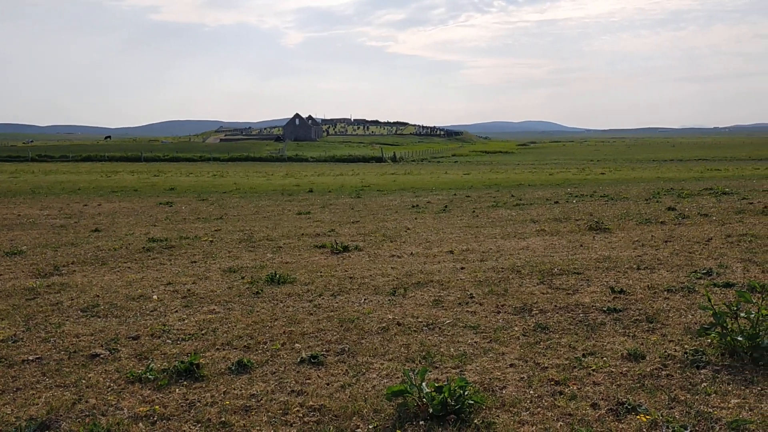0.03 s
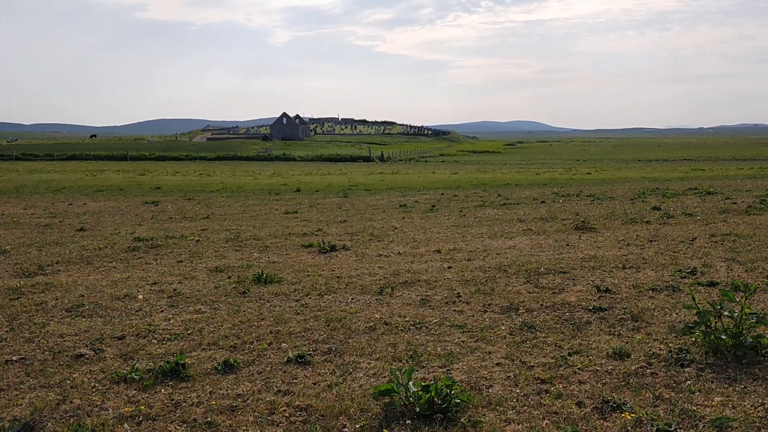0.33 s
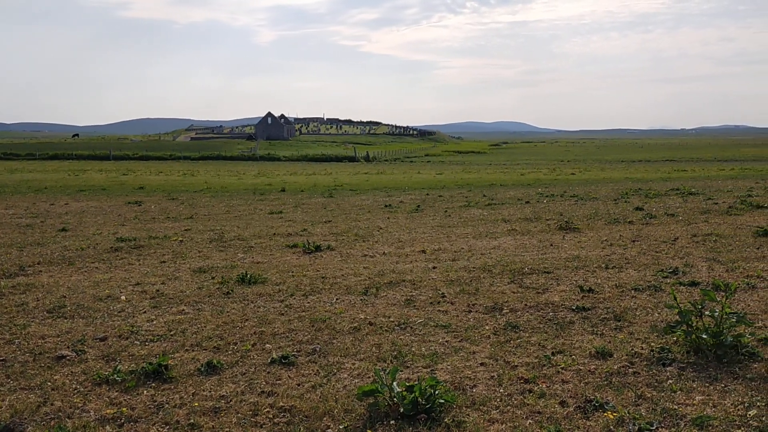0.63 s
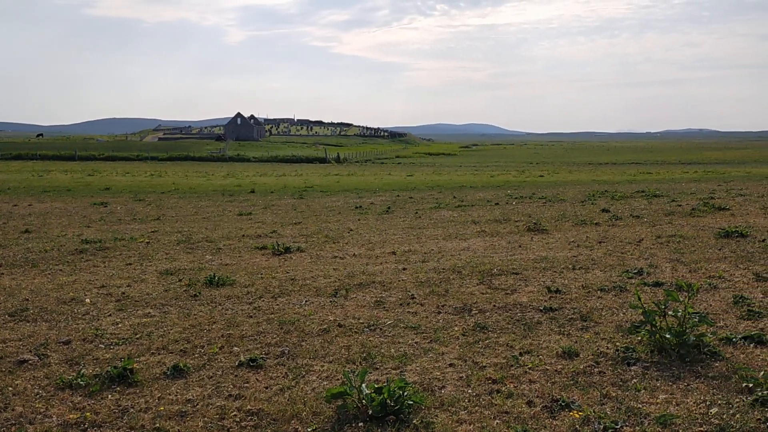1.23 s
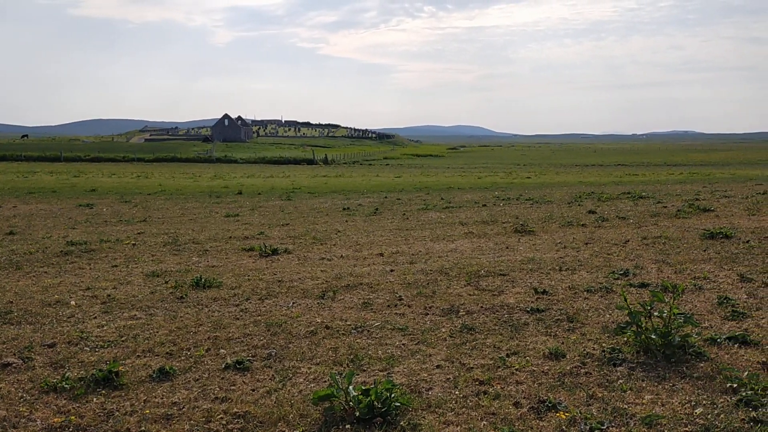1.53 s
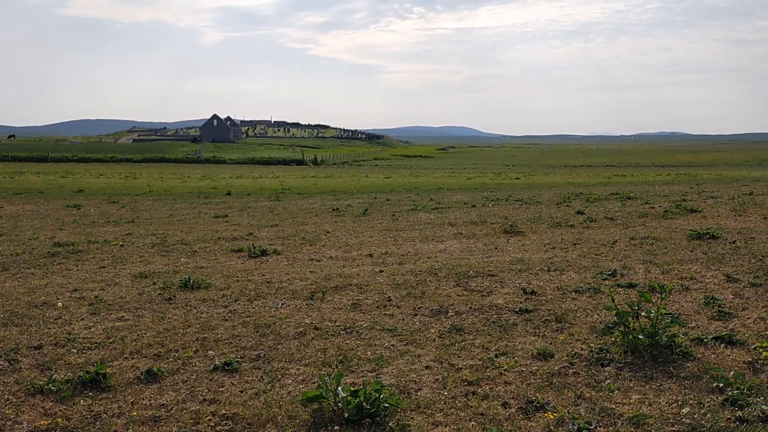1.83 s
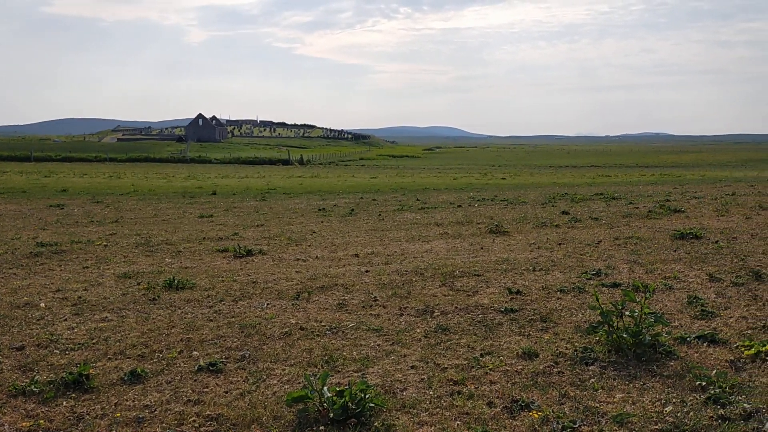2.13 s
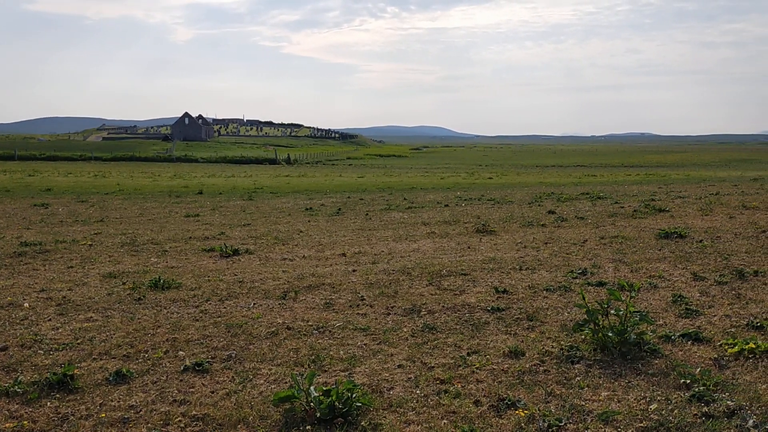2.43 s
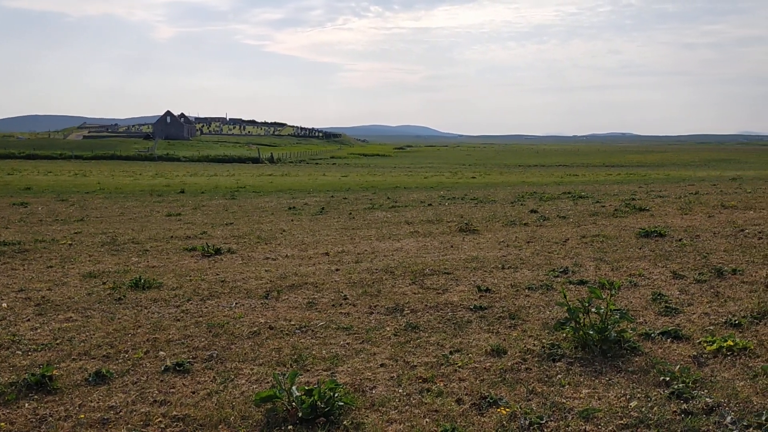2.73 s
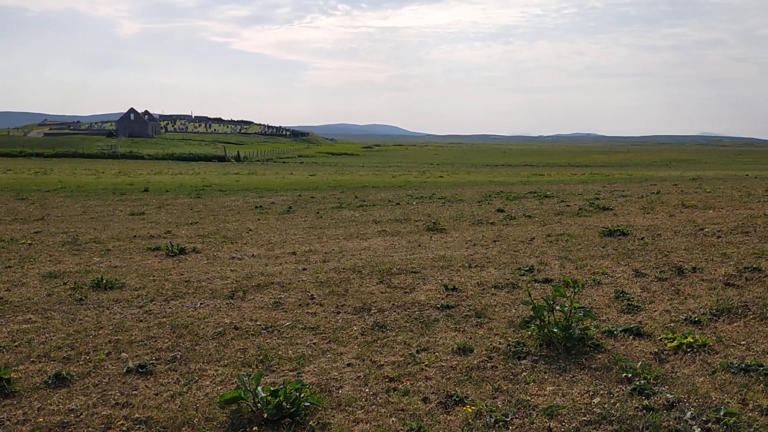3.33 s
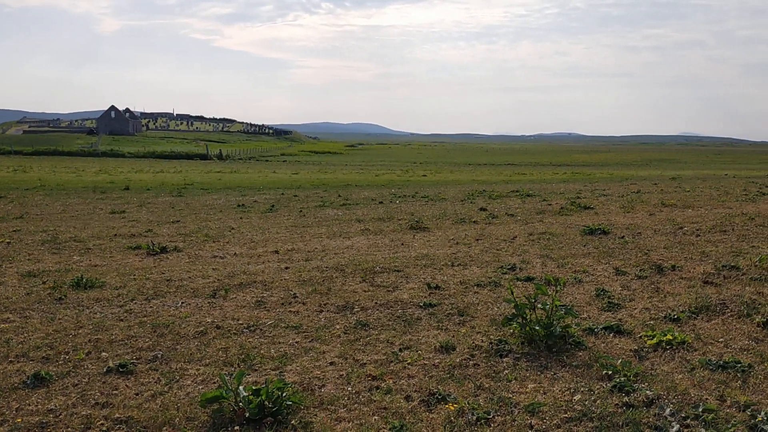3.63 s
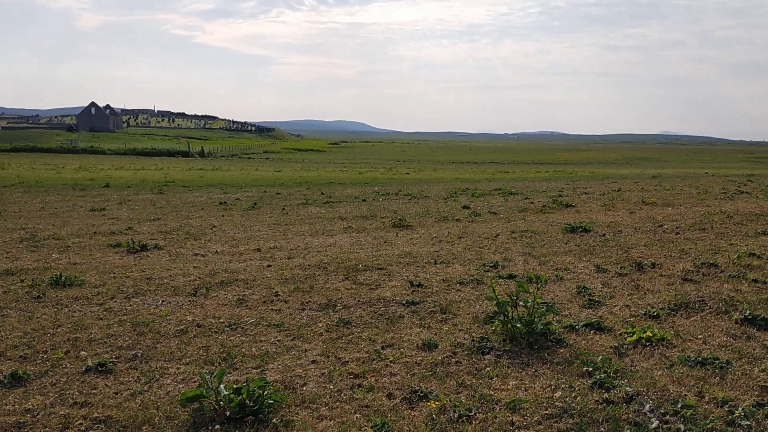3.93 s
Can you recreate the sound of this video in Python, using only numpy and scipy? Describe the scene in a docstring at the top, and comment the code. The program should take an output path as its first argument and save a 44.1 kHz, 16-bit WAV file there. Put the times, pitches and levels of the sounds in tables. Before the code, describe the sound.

A corncrake calls in an open field with short, harsh, rattling rasps in three pairs, at about 0.5 and 1.0 seconds, 1.7 and 2.2, then 2.9 and 3.5. Further off, a skylark sings thin whistles, ticks and quick trills throughout. From about 0.5 seconds low wind rumbles on the microphone, with gusts and soft thumps, growing strongest near 4 seconds. A faint hiss lies underneath.

```python
"""Corncrake in a windy field

A corncrake rasps three pairs of calls, each a limping rattle of short bursts ringing in its throat.
Further off a skylark sings thin slurs, whistles, ticks and trills, all sliding sine tones.
Wind buffets the microphone over a bed of soft hiss and a few faint, distant low calls."""
import sys
import numpy as np
from scipy import signal
from scipy.fft import rfft, irfft
from scipy.io import wavfile

SR = 44100
rng = np.random.default_rng(int(sys.argv[2]) if len(sys.argv) > 2 else 0)


def transcribe(u):
    """Save the signal u as a 16-bit wav file named by the first command-line argument.

    u: samples, shape (n,) or (channels, n), limited to [-1, 1]; the rate is SR.
    q: integer samples, one column per channel.
    """
    v = np.clip(np.atleast_2d(u).T, -1, 1)
    q = np.round(v * 32767).astype(np.int16)
    wavfile.write(sys.argv[1], SR, q)


N = 176400

# corncrake calls: t/s, length/s, level/dB, middle boost/dB, top boost/dB, body boost/dB
RASPS = [(0.462, 0.16, -73, 7, 0, 6), (0.9747, .175, -70, 6, 11.5, 7), (1.7393, 0.16, -66, 1.5, -1, 3),
         (2.2272, 0.18, -63.5, 3.5, -5, 5), (2.9499, 0.16, -65, 0, 4.5, 5), (3.458, 0.19, -66, 0, 6, 7)]
# the limping cycle of steps from burst to burst: interval/s
LIMP_STEPS = [.0076, .0102, .0092, .0082, .0112, .0074, .0096, .011]
# bright throat resonances: f/Hz, width/Hz, level/dB
THROAT_PEAKS = [(3002, 280, -17), (3500, 490, -18.5), (4143, 257, -3.5), (4524, 300, -7.5), (4950, 340, -7),
                (5330, 230, -5.5), (6030, 510, -5.5), (6440, 240, 1), (6800, 310, -5), (7570, 370, -15.5)]
# low body resonances: f/Hz, width/Hz, level/dB
BODY_PEAKS = [(830, 270, 0), (1147, 150, 3), (1927, 290, -8), (2333, 160, 3)]
BURST_S, JITTER_S, BURST_SCATTER_DB = .0053, .00035, 1
AIR_SHARE, SNAP_DEPTH = .4, .5  # fresh noise in a burst's power; dip that splits the burst in two
LEAD_S, LEAD_DB = .0073, -3
THROAT_SWELL_DB, BODY_SWELL_DB, BODY_DB = 2.5, 7.5, -22
MIDDLE_HZ, TOP_HZ = 4600, 7500

# skylark single notes: t/s, length/s, start f/Hz, end f/Hz, level/dB
LARK_NOTES = [(0.094, 0.0052, 7360, 7060, -69), (.237, 0.015, 5830, 5440, -78),
              (0.276, 0.014, 5860, 5400, -73.5), (0.868, .028, 4200, 3600, -77),
              (1.221, .03, 5550, 4980, -76), (1.25, 0.022, 6050, 5130, -75),
              (2.036, 0.023, 5840, 5215, -73.5), (3.15, 0.048, 4100, 3660, -75.5)]
# short whistles: t/s, f/Hz, level/dB
LARK_WHISTLES = [(.259, 4800, -86), (0.295, 4820, -88), (.385, 3640, -88), (.61, 3820, -79),
                 (.747, 3760, -80), (.892, 3800, -79), (0.923, 4590, -77), (1.417, 3760, -72.5),
                 (1.557, 3810, -74.5), (1.699, 3750, -76.5), (3.649, 3930, -76.5)]
# quick falling ticks: t/s, length/s, level/dB
LARK_TICKS = [(0.789, 0.012, -77.5), (.937, 0.0083, -73.5), (1.197, 0.0098, -80), (1.462, 0.0077, -69.5),
              (1.603, 0.0071, -73), (1.924, 0.012, -71.5), (1.983, .014, -71), (2.619, 0.0072, -73),
              (2.751, .007, -80.5), (2.806, 0.012, -79), (2.902, 0.009, -76)]
# a tick's start and end pitch: f/Hz
TICK_PITCHES = [4730, 3530]
# doubled slurs: t/s, delay of the second/s, first level/dB, second level/dB
LARK_SLURS = [(0.688, .016, -79, -76.5), (0.843, 0.015, -76.5, -82), (1.479, 0.032, -73, -79),
              (1.62, 0.032, -76.5, -76)]
# a slur's steep fall, shoulder, second fall and hook, at even steps: f/Hz
SLUR_PITCHES = [6050, 5400, 5060, 4950, 4530, 4350]
# trills: t/s, length/s, note rate/Hz, start f/Hz, end f/Hz, fall within a note/Hz, level before shaping/dB
LARK_TRILLS = [(0.068, 0.053, 66, 4950, 5400, 2301, -72), (0.138, 0.076, 61, 4720, 4750, -750, -75),
               (0.29, 0.089, 74, 4130, 3580, 300, -80), (1.246, 0.14, 63, 4970, 4600, 402, -68.5),
               (2.088, 0.14, 102, 4990, 4320, 593.5, -68), (2.52, 0.12, 70, 4970, 4520, 455, -70),
               (2.588, 0.11, 91, 4470, 3970, 348, -74.5), (3.143, 0.069, 120, 5750, 5500, 594, -65.5),
               (3.407, 0.035, 125, 4400, 4680, 901, -68)]
WHISTLE_S, WHISTLE_SAG_HZ = .033, 54
SLUR_S, SLUR_SWELL_DB = .047, 8
RUN_START_S, RUN_COUNT, RUN_PERIOD_S, RUN_HZ, RUN_DB = 3.763, 6, .0345, [6100, 4850, 4450], -74.5
NOTE_FLICKER_DB, NOTE_WAVER, WIDE_SLIDE_HZ = 2.5, .01, 540

# steady wind on the microphone: t/s, level/dB
WIND_LEVELS = [(0, -64.5), (.44, -66), (.48, -54), (.75, -50.5), (.93, -59.5), (1.05, -52), (1.6, -48),
               (2.17, -55.5), (2.6, -49), (4, -44)]
# gusts: peak t/s, length/s, level/dB
WIND_GUSTS = [(0.58, 0.24, -52.5), (1.024, 0.064, -58.5), (1.38, 0.45, -58.5), (1.98, 0.14, -57),
              (2.713, 0.13, -50), (3.281, 0.063, -52.5), (3.833, 0.27, -49.5)]
# single buffets of air: t/s, width/s, level/dB
WIND_BUFFETS = [(.557, 0.0033, -35.5), (1.031, 0.0028, -42.5), (1.4412, 0.0019, -32.5),
                (2.3798, 0.00052, -49), (2.684, .003, -32.5), (3.089, 0.0028, -39), (3.303, 0.0044, -33.5),
                (3.904, 0.0039, -31.5)]
# colour of the deep wind rumble: f/Hz, level/dB
RUMBLE_SPECTRUM = [(15, -4.5), (40, 3.5), (65, 0), (100, -4), (140, -23), (220, -34.5), (400, -70.5)]
# colour of the higher wind flutter: f/Hz, level/dB
FLUTTER_SPECTRUM = [(50, -30), (100, 3.5), (140, 2), (200, -5.5), (300, -16.5), (450, -27.5), (800, -40.5),
                    (2000, -55.5)]
GUST_RUMBLE_DB, STEADY_FLUTTER_DB, CHURN_DB = 2.5, -14.5, 3

# distant low calls: t/s, length/s, f/Hz, width/Hz, level/dB
FAR_CALLS = [(-.03, 0.14, 690, 195, -73.5), (1.807, 0.12, 392, 69, -73), (3.29, 0.11, 567, 110.4, -71.5)]
# background bed: t/s, air level/dB, hiss level/dB
BED_LEVELS = [(0, -75.5, -73.5), (.42, -77, -77), (1.3, -74.5, -72.5), (2.55, -72, -72), (4, -72.5, -71)]
# colour of distant moving air: f/Hz, level/dB
AIR_SPECTRUM = [(100, 8), (300, 4.5), (800, -2), (1200, -8.5), (1800, -12.5), (3200, -17), (5000, -11.5),
                (8000, -18)]
# colour of the high hiss: f/Hz, level/dB
HISS_SPECTRUM = [(2500, -40), (3700, -12), (4500, -7), (5500, -6), (6500, -4), (7400, 3), (7900, -13.5),
                 (8400, -5)]
TAIL_DECAY_S, HIGH_CUT_HZ = .075, 8100


def corncrake():
    """Three pairs of rasps, each with its own throat colour."""
    out = np.zeros(N)
    for start, length, db, middle_db, top_db, body_db in RASPS:
        add(out, start - .6 * BURST_S, undb(db) * rasp(length, middle_db, top_db, body_db))
    return out


def rasp(length, middle_db, top_db, body_db, size=16384):
    """One call: a weak lead burst, then a limping train of double snaps rings throat and body."""
    limp = np.r_[0, np.cumsum(np.tile(LIMP_STEPS, len(LIMP_STEPS)))]
    centres = BURST_S / 2 + np.r_[0, LEAD_S + limp]
    scatter = rng.standard_normal((len(centres), 2))
    u = np.linspace(0, 1, int(BURST_S * SR))
    double_hump = np.sqrt(arch(u)) * (1 - SNAP_DEPTH * arch(2 * u - .5) ** 2)
    # every burst reuses this snap, mixed with fresh air
    snap = unit(irfft(np.exp(2j * np.pi * rng.random(len(u) // 2 + 1)), len(u)))
    throat = []
    for hz, width, db in THROAT_PEAKS:
        middle_boost = middle_db * np.exp(-((hz - MIDDLE_HZ) / 600) ** 2)
        top_boost = top_db * np.exp(-((hz - TOP_HZ) / 700) ** 2)
        throat.append((hz, width, db + middle_boost + top_boost))
    bright, body_drive = np.zeros(size), np.zeros(size)
    for k, (at, (late, loud)) in enumerate(zip(centres[centres < length + BURST_S / 2], scatter)):
        grain = np.sqrt(1 - AIR_SHARE) * snap + np.sqrt(AIR_SHARE) * rng.standard_normal(len(u))
        burst = np.zeros(size)
        add(burst, at + JITTER_S * late - BURST_S / 2, double_hump * grain)
        push = undb(BURST_SCATTER_DB * loud + LEAD_DB * (k == 0))
        effort = arch((at / (length + BURST_S)) ** 1.3) - 1  # crests just past the middle
        bright += push * unit(resonate(burst, throat)) * undb(THROAT_SWELL_DB * effort)
        body_drive += push * burst * undb(BODY_SWELL_DB * effort)
    body = undb(BODY_DB + body_db) * unit(resonate(body_drive, BODY_PEAKS))
    return (unit(bright) + body) * np.sqrt(size / SR / length)


def skylark():
    """Single notes, whistles, ticks, doubled slurs, quick trills and a closing run of falling slurs."""
    out = np.zeros(N)
    for start, length, from_hz, to_hz, db in LARK_NOTES:
        add(out, start, undb(db) * lark_note(length, [from_hz, to_hz]))
    for start, hz, db in LARK_WHISTLES:
        add(out, start, undb(db) * lark_note(WHISTLE_S, [hz, hz - WHISTLE_SAG_HZ]))
    for start, length, db in LARK_TICKS:
        add(out, start, undb(db) * lark_note(length, TICK_PITCHES))
    for start, delay, first_db, second_db in LARK_SLURS:
        for at, db in (start, first_db), (start + delay, second_db):
            add(out, at, undb(db) * lark_note(SLUR_S, SLUR_PITCHES, SLUR_SWELL_DB))
    for start, length, rate, from_hz, to_hz, fall, db in LARK_TRILLS:
        for at in np.arange(0, length - .5 / rate, 1 / rate):
            hz = (from_hz + (to_hz - from_hz) * at / length) * (1 + .015 * rng.standard_normal())
            gain = undb(db + 3.5 * (arch(at / length) - 2))  # loudest mid-trill
            add(out, start + at, gain * lark_note(.75 / rate, [hz + fall / 2, hz - fall / 2]))
    for k in range(RUN_COUNT):
        gain = undb(RUN_DB + rng.standard_normal())
        add(out, RUN_START_S + k * RUN_PERIOD_S, gain * lark_note(RUN_PERIOD_S, RUN_HZ))
    return out


def lark_note(length, pitches, swell_db=0):
    """A thin, flickering sine that glides through its pitches, wavering when it slides far."""
    u = np.linspace(0, 1, max(int(length * SR), 2))
    contours = pitches, *rng.standard_normal((2, 9))
    glide, waver, flicker = (np.interp(u, np.linspace(0, 1, len(row)), row) for row in contours)
    hz = glide * (1 + NOTE_WAVER * waver * np.tanh(np.ptp(glide) / WIDE_SLIDE_HZ))
    envelope = undb(NOTE_FLICKER_DB * flicker + swell_db * u) * np.sqrt(arch(u))
    return unit(envelope * np.sin(2 * np.pi * np.cumsum(hz) / SR))


def wind():
    """Wind rumbles on the microphone; gusts bring up a higher flutter, and eddies hit as single thumps."""
    t = np.arange(N) / SR
    steady = undb(curve(WIND_LEVELS, column=1))
    gusts = sum(undb(db) * np.sqrt(arch((t - at) / length + .5)) for at, length, db in WIND_GUSTS)
    churn = undb(CHURN_DB * noise([(14, 2.5), (40, -24), (100, -88.5)]))
    rumble = np.hypot(steady, undb(GUST_RUMBLE_DB) * gusts) * noise(RUMBLE_SPECTRUM)
    flutter = np.hypot(undb(STEADY_FLUTTER_DB) * steady, gusts) * churn * noise(FLUTTER_SPECTRUM)
    out = rumble + flutter
    for at, width, db in WIND_BUFFETS:
        u = (t - at) / width
        out -= undb(db) * 2 * u / (1 + u ** 2 / 2) ** 3  # one push, then one pull
    return out


def far_calls():
    """Faint low calls, blurred by distance into swells of narrow-band noise."""
    t = np.arange(N) / SR
    out = np.zeros(N)
    for start, length, hz, width, db in FAR_CALLS:
        band = unit(resonate(rng.standard_normal(N), [(hz, width, 0)]))
        out += undb(db) * arch((t - start) / length) * band
    return out


def background():
    """A bed of distant moving air and fine high hiss."""
    air = undb(curve(BED_LEVELS, column=1)) * noise(AIR_SPECTRUM)
    hiss = undb(curve(BED_LEVELS, column=2)) * noise(HISS_SPECTRUM)
    return air + hiss


def field(x, wet_db):
    """Add a faint tail scattered back from the open land."""
    tail = unit(rng.standard_normal(SR) * np.exp(-np.arange(SR) / SR / TAIL_DECAY_S))
    return x + undb(wet_db) * signal.fftconvolve(x, tail / np.sqrt(SR))[:N]


def resonate(x, peaks):
    """Ring steep-sided resonances: f/Hz, width/Hz, level/dB."""
    n = len(x)
    f = np.arange(n // 2 + 1) * SR / n
    power = sum(undb(db) ** 2 / (1 + ((f - hz) / (.48 * width)) ** 2) ** 2 for hz, width, db in peaks)
    # minimum phase, so the ring follows the hit
    cepstrum = irfft(np.log(power + 1e-12) / 2, n)
    cepstrum[1:n // 2] *= 2
    cepstrum[n // 2 + 1:] = 0
    return irfft(rfft(x) * np.exp(rfft(cepstrum)), n)


def noise(spectrum):
    """Noise at rms 1, coloured by points of f/Hz, level/dB."""
    hz, db = np.array(spectrum).T
    f = np.arange(N // 2 + 1) * SR / N
    colour = undb(np.interp(np.log(f + 1), np.log(hz), db))
    return unit(irfft(rfft(rng.standard_normal(N)) * colour, N))


def arch(u):
    """Half a sine over 0-1, silent outside."""
    return np.sin(np.pi * np.clip(u, 0, 1)).clip(0)


def curve(rows, column):
    """One column of a timed table as a fader move."""
    rows = np.array(rows)
    return np.interp(np.arange(N) / SR, rows[:, 0], rows[:, column])


def add(out, start, x):
    """Mix x in at start/s."""
    i = int(start * SR)
    x, i = x[max(-i, 0):], max(i, 0)
    out[i:i + len(x)] += x[:max(len(out) - i, 0)]


def undb(db):
    """Decibels to gain."""
    return 10 ** (np.asarray(db) / 20)


def unit(x):
    """Scale to rms 1."""
    return x / np.sqrt(np.mean(x ** 2) + 1e-20)


def scene():
    """The mono mix: both birds, with a touch of field tail, over wind and background."""
    ambience = wind() + background() + far_calls()
    return (ambience + field(corncrake(), wet_db=-12) + field(skylark(), wet_db=-13))[None]


def record(dry):
    """The recorder cuts the top steeply."""
    return signal.sosfilt(signal.ellip(10, .2, 70, HIGH_CUT_HZ, fs=SR, output="sos"), dry)


dry = scene()
out = record(dry)
transcribe(out)
```